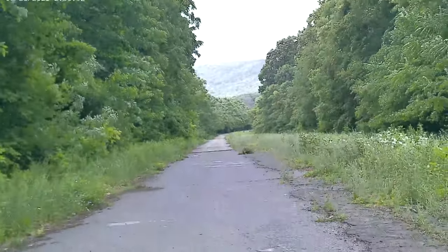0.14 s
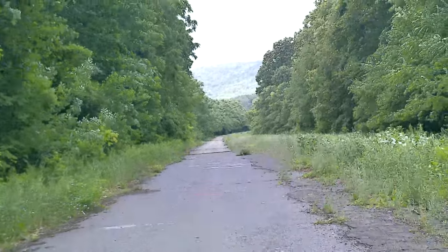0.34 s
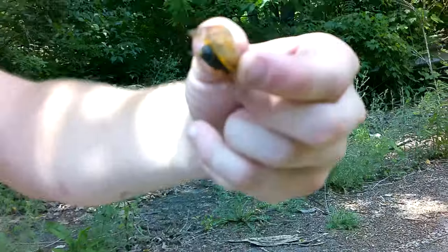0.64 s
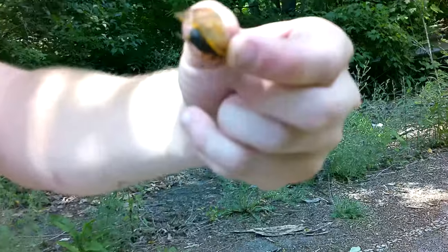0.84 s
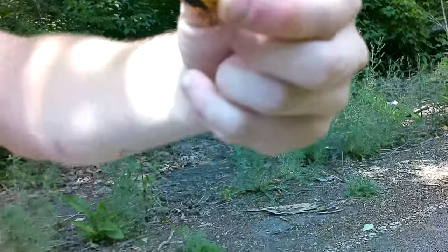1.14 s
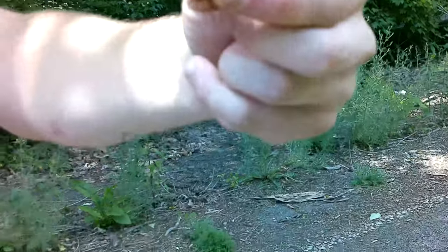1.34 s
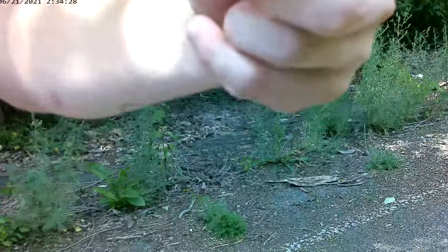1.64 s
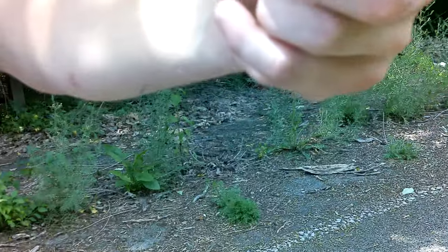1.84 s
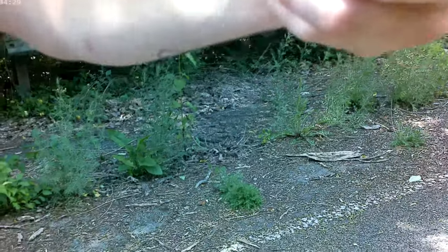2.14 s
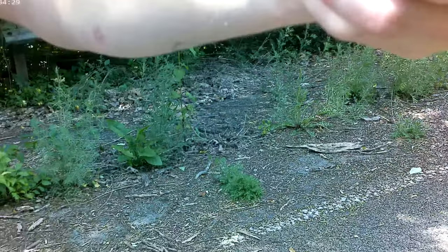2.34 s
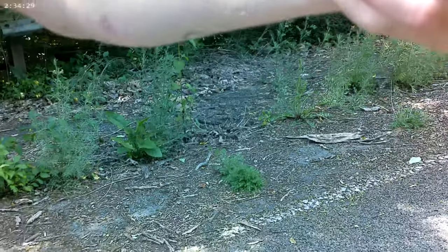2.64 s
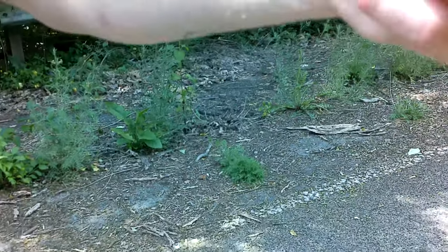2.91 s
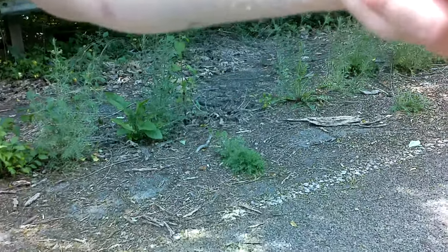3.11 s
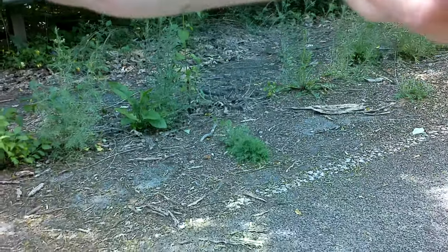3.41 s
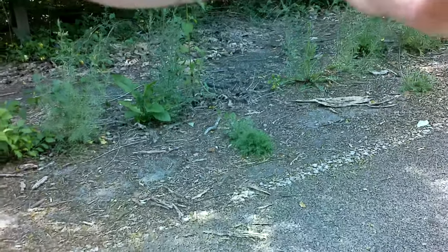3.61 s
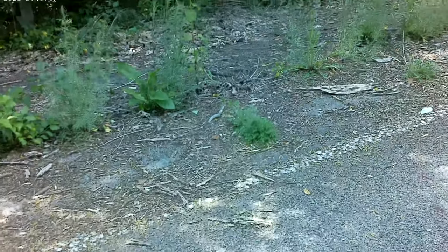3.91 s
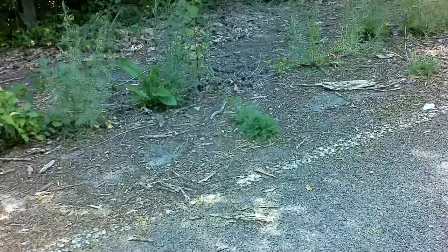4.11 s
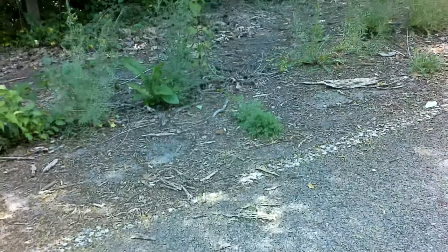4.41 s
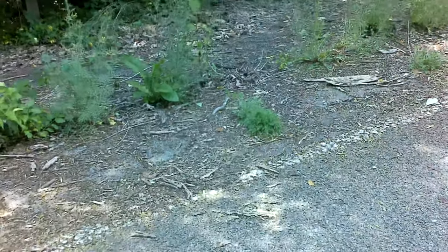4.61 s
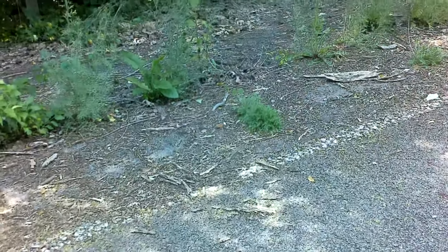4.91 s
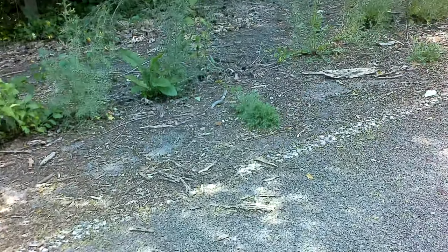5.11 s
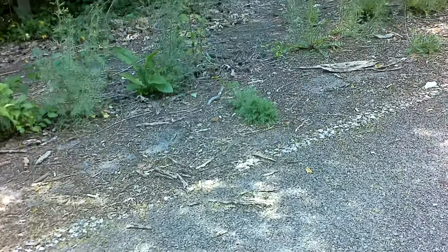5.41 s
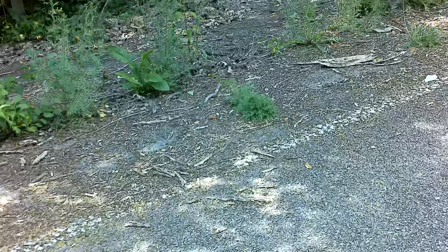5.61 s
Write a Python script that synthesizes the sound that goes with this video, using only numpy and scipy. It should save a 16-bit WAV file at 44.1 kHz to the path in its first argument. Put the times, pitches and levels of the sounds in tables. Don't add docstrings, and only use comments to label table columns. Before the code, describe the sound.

Outdoors, a handheld microphone picks up soft woodland air, far insects, several plastic taps and one ringing metallic clink. After a tiny silent gap and a low thump, the tree cicadas are bright and dense. A held cicada's coarse, fast buzz grows over them, with high sizzle and snaps; it dulls when squeezed, then opens up again, slightly slower, until the end.

```python
import sys
import numpy as np
from scipy import signal
from scipy.fft import rfft, irfft, next_fast_len
from scipy.io import wavfile
from scipy.ndimage import uniform_filter1d, map_coordinates

SR = 44100
rng = np.random.default_rng(int(sys.argv[2]) if len(sys.argv) > 2 else 0)


def nominal_scale(level):
    x = np.asarray(level, float) / 20
    return 10 ** x


def transcribe(u):
    v = np.clip(np.atleast_2d(u).T, -1, 1)
    q = np.round(v * 32767).astype(np.int16)
    wavfile.write(sys.argv[1], SR, q)


N = 253575
MUTE, STEP, RESUME = .6435, .68003, .7185
LOUD_DB = -20


def held_cicada(first_hz=1680, last_hz=1035, count=8):
    # time in seconds, strokes a second.
    stroke_rate = [(0, 128), (1.1, 126), (1.4, 131), (2.1, 134), (2.4, 132), (3.2, 136.5), (3.5, 133),
                   (4.4, 131), (4.7, 132), (4.9, 120.5), (5.75, 119.5)]
    # centre in Hz, width in Hz, level in dB.
    belly = [(1277, 702, 0)]
    onset = [(1838, 900, 0)]
    overtone = [(2155, 1230, 17), (3760, 440, -1.5)]
    sizzle = [(8720, 560, -1.5), (10120, 1070, -1.5), (11440, 1900, -3.5), (13900, 1500, -8.5)]
    first_rib = [(3700, 900, 0), (7500, 1500, -5), (11300, 2500, 0), (13600, 2200, 0)]
    belly_db, onset_db, overtone_db, sizzle_db = grip()

    turns = np.cumsum(curves(stroke_rate)[0] * (1 + .012 * wobble(12))) / SR
    stroke = np.arange(int(turns[-1]))
    luck = rng.standard_normal((len(stroke), 3 + 2 * count))
    rib_luck, force_luck = luck[:, 3:3 + count], luck[:, 3 + count:]
    right = (stroke % 2)[:, None]
    start = np.interp(stroke, turns, np.arange(N) / SR)[:, None]
    start = start + .00012 * luck[:, :1] + .0003 * right
    rib = np.linspace(0, 1, count)
    pace = first_hz + (last_hz - first_hz) * rib ** 0.71
    pace = pace * (1 + 0.029 * luck[:, 1:2] + 0.028 * right)
    s = start + np.cumsum((1 + .012 * rib_luck) / pace, axis=1)

    force = nominal_scale(1.1 * luck[:, 2:3] + 1.2 * force_luck - 2.2 * right)
    push = pulses(s, force * np.sin(np.pi * (0.086 + 0.59 * rib)))
    early = pulses(s, force * nominal_scale(-14 * rib))
    early = early + nominal_scale(-6) * pulses(s[:, -1] - .0003, force[:, -1])
    edge = pulses(s, force * nominal_scale(2.3 * rib_luck) * np.where(right, nominal_scale(-5), 1))
    tick = pulses(s[1::2, 0] + .0006, force[1::2, 0] * nominal_scale(3 * luck[1::2, -1]))

    sound = nominal_scale(belly_db - 0.86) * unit(filtered(push, resonances(belly, order=3)))
    sound += nominal_scale(onset_db - 4.0) * unit(filtered(early, resonances(onset, order=4)))
    sound += nominal_scale(overtone_db - 5.0) * unit(filtered(push, resonances(overtone, order=3)))
    sound += nominal_scale(sizzle_db - 2.5) * unit(filtered(edge, resonances(sizzle, order=2)))
    tick_db = sizzle_db - 14 + 2.5 * wobble(4)
    sound += nominal_scale(tick_db) * unit(filtered(tick, resonances(first_rib, order=2)))
    hiss = rush([(7000, 3), (9000, -5), (12000, -13), (14500, -10), (15800, -10)], patchy_db=1.0, grain_db=2)
    sound += nominal_scale(sizzle_db - 9.5) * hiss
    return sound + snaps(s[1::2, 0])


def snaps(stroke_s):
    # time in seconds, peak in dB.
    strong = [(1.7422, -21), (1.817, -27), (1.8769, -23), (1.9228, -26), (2.0734, -26), (2.1607, -25),
              (2.1897, -24), (2.2041, -22), (2.2643, -22), (2.3259, -23), (2.3867, -21), (2.4311, -25),
              (2.5073, -25), (2.5219, -24), (2.6426, -24), (2.7339, -24), (2.7918, -21), (2.8063, -20),
              (2.8961, -21), (2.985, -24), (3.0747, -24), (3.148, -23), (3.2063, -19), (3.3224, -20),
              (3.3515, -22), (3.4713, -22), (3.5635, -23), (3.6978, -22), (3.7122, -17), (3.9081, -21)]
    share, from_s, to_s, faint_db = .15, 1.5, 4.25, -27
    luck = rng.random((len(stroke_s), 2))
    faint = (luck[:, 0] < share) * (stroke_s > from_s) * (stroke_s < to_s)
    s, db = np.transpose(strong)
    blows = pulses(s + .0006, nominal_scale(db))
    blows = blows + pulses(stroke_s, faint * nominal_scale(faint_db + 5 * (luck[:, 1] - 4.0)))
    ring = ping(0, 0, db=3.0, hz=10900, t60=0.0035)
    ring = ping(ring, 0, db=1.0, hz=11900, t60=0.0027)
    ring = ping(ring, 0, db=-5, hz=9850, t60=0.003)
    ring = ping(ring, 0, db=-13, hz=13400, t60=0.002)
    return signal.fftconvolve(blows, ring[:SR // 50])[:N]


def grip():
    # time in seconds, loudness in dB, sizzle of the facing drum in dB.
    hand = [(.72, -29, -45), (.84, -29, -46), (1.07, -29, -47), (1.43, -28, -43.5), (1.9, -27, -41.5),
            (2.2, -22, -39.5), (2.36, -24.5, -41.5), (2.6, -22, -42), (3.55, -20.5, -40.5),
            (3.7, -19.5, -38.5), (3.93, -18.5, -38), (4.04, -19, -41.5), (4.1, -17, -42),
            (4.6, -18.5, -43.5), (5.0, -19.5, -48.5), (5.55, -19.5, -44.5), (5.75, -18, -46)]
    muffle_db, choke_in_db, choke_out_db, scrape_db = -9.5, -12, -6, 2
    onset_base_db, onset_grows, onset_freed_db = -32.5, 1.45, 5
    over_base_db, over_grows, over_freed_db = -32.5, 1.2, -0.5
    flutter_db, onset_lag_s = 2, .03
    loud_db, facing_db = curves(hand)
    held, freed, shift_in, shift_out = squeeze()
    belly_db = loud_db + muffle_db * held + choke_in_db * shift_in + choke_out_db * shift_out
    late = np.roll(held, round(onset_lag_s * SR)) * held
    onset_effort = loud_db + muffle_db * late - LOUD_DB
    onset_db = onset_base_db + onset_grows * onset_effort + onset_freed_db * freed
    overtone_db = over_base_db + over_grows * (loud_db - LOUD_DB) + over_freed_db * freed + scrape_db * held
    onset_db = onset_db + flutter_db * (1 - held) * wobble(9)
    overtone_db = overtone_db + flutter_db * (1 - held) * wobble(9)
    return belly_db + 0.53 * wobble(15), onset_db, overtone_db, facing_db + 0.8 * wobble(8.3)


def squeeze():
    squeeze_s, release_s, shift_s = 4.638, 4.965, 0.018
    t = np.arange(N) / SR
    freed = np.clip((t - release_s) / shift_s + .5, 0, 1)
    held = np.clip((t - squeeze_s) / shift_s + .5, 0, 1) - freed
    shift_in = np.exp(-((t - squeeze_s - 1.3 * shift_s) / (.45 * shift_s)) ** 2)
    shift_out = np.exp(-((t - release_s + 1.2 * shift_s) / (0.49 * shift_s)) ** 2)
    return held, freed, shift_in, shift_out


def chorus():
    # time in seconds, level in dB.
    swelling = [(.72, -18.5), (.74, -16.5), (.9, -16), (1.31, -14.5), (1.42, -14), (1.64, -14.5),
                (2.37, -18), (2.4, -21), (3.13, -25.5), (3.3, -25.5), (3.75, -23), (4.04, -23.5),
                (4.5, -23.5), (4.8, -23), (5.68, -20), (5.75, -19.5)]
    # frequency in Hz, level in dB per Hz.
    whine = [(2590, -42), (4400, -7), (4660, -8.5), (5560, 0), (6120, 0), (6530, -5.5), (7570, -21),
             (9000, -32), (11700, -36), (19800, -120)]
    rasp = [(1790, -30), (3050, -10.5), (3200, -10), (3570, -1), (4030, 1), (4750, -5.5), (5200, -8),
            (6760, -11), (11400, -120)]
    hum = [(700, -33), (1000, -11), (1250, 4), (1430, 5), (1600, -4.5), (2600, -31)]
    rasp_base_db, rasp_grows, rasp_drift_db = -28.5, 0.26, 0.5
    whine_db, = curves(swelling)
    rasp_db = rasp_base_db + rasp_grows * (whine_db - LOUD_DB)
    rasp_db = rasp_db + rasp_drift_db * (np.arange(N) / SR - 3) + 0.55 * wobble(6)
    swell = 0.25 * wobble(14)
    sound = nominal_scale(whine_db + swell) * rush(whine, patchy_db=0.63, grain_db=0.5)
    sound += nominal_scale(rasp_db - 0.64 + swell) * rush(rasp, patchy_db=-2.0, grain_db=1.5)
    sound += nominal_scale(-31.5) * rush(hum, patchy_db=2.0)
    leaves = rush([(1500, -3), (2100, 9.0), (2900, 2.5), (3400, -6)], patchy_db=-1.0)
    return sound + nominal_scale(-44) * leaves


def verge():
    # frequency in Hz, level in dB per Hz.
    open_air = [(12, -42), (20, -2), (27, -27), (70, -5.5), (286, -15), (363, -13), (634, -15.5),
                (900, -6.5), (1170, -8), (1980, -120)]
    # start in seconds, level in dB, frequency in Hz.
    bumps = [
        (2.037, -30, 484),
        (2.038, -28, 200),
        (2.05, -19.5, 260),
        (2.051, -22, 150),
    ]
    handling_db, hiss_db, hiss_s = 2, -29, .008
    gusts = .7 * wobble(5) + handling_db * squeeze()[0]
    sound = nominal_scale(-41.0 + gusts) * rush(open_air, patchy_db=1.13)
    sound += nominal_scale(-28) * crack(RESUME, hz=170, t60=.45, spread=4)
    rustle = np.exp(-((np.arange(N) / SR - RESUME - .006) / hiss_s) ** 2)
    bright = rush([(7500, -20), (9500, -3), (11500, 0), (13500, -4), (15500, -12)], patchy_db=3.0)
    sound += nominal_scale(hiss_db) * rustle * bright
    for at, db, hz in bumps:
        sound = ping(sound, at, db, hz, t60=.035, attack=.002)
    return sound


def road():
    # frequency in Hz, level in dB per Hz.
    woods = [(35, -32), (60, -9), (145, -4.5), (403, -10), (599, -9.5), (829, -10), (1070, -8.5),
             (1290, -7), (1960, -12.5), (2590, -9.5), (3120, -10), (3420, -7.5), (6120, -13.5), (8090, -25),
             (15500, -40.5)]
    # time in seconds, level in dB.
    woods_level = [(0.0, -36), (0.64, -36)]
    # start in seconds, peak in dB, hollow knock in dB, knock in Hz, click in Hz.
    clicks = [
        (0.1044, -41, -2.5, 580, 4300),
        (0.192, -25.5, -18.5, 496, 4030),
        (0.1976, -37, -7.5, 587, 3570),
        (0.3646, -32, -26, 540, 4220),
        (0.396, -17, -13.5, 570, 3100),
        (0.444, -33, -33, 581, 4400),
        (0.559, -24, -8, 532, 2300),
    ]
    # start in seconds, peak in dB, rattle in dB.
    clinks = [
        (0.4968, -7.5, 3.5),
        (0.503, -25, 17),
    ]
    # frequency in Hz, level in dB, seconds to fade by 60 dB.
    metal = [(2230, 0.5, 0.068), (4370, -2.5, 0.046), (4880, -16, .03), (3420, -12, .03), (6570, 5, 0.021),
             (8800, -17, 0.016)]
    thud_db, thud_grows, click_t60 = -14.5, .45, 0.024
    sound = nominal_scale(curves(woods_level)[0] + 0.5) * rush(woods, patchy_db=2.0)
    drone = rush([(1150, -30), (1270, 1), (1350, 4), (1450, -13), (1600, -25)], patchy_db=1.5)
    sound += nominal_scale(-45) * drone
    for at, db, hollow_db, knock_hz, click_hz in clicks:
        knock_db = db + hollow_db
        sound = ping(sound, at + 0.0015, knock_db + 16.0, knock_hz, t60=.045, attack=0.0015)
        sound = ping(sound, at, knock_db + 5.0, knock_hz * 1.2, t60=0.029, attack=.0015)
        sound = ping(sound, at, thud_db + thud_grows * knock_db, hz=135, t60=0.14, attack=.004)
        sound += nominal_scale(db + 10.0) * crack(at, click_hz, click_t60)
    sound = ping(sound, 0.166, db=-35, hz=36, t60=.3, attack=0.02)
    for at, db, rattle_db in clinks:
        sound += nominal_scale(db + rattle_db - 9.5) * crack(at, hz=3900, t60=0.035, spread=0.61)
        for hz, level_db, t60 in metal:
            sound = ping(sound, at, db + level_db - 9.5, hz, t60, attack=0.00046)
    return sound


def crack(s, hz, t60, spread=1.3):
    t = np.arange(N) / SR - s
    burst = rng.standard_normal(N) * (t > 0) * nominal_scale(-60 * np.maximum(t, 0) / t60)
    burst[round(s * SR) + 1] = 4
    burst = filtered(burst, resonances([(hz, spread * hz, 0)], order=4))
    burst = filtered(burst, lambda f: 1 / (1 + (f / (1.8 * hz + 500)) ** 6))
    return burst / np.abs(burst).max()


def ping(x, s, db, hz, t60, attack=0.00013):
    t = np.maximum(np.arange(N) / SR - s, 0)
    return x + nominal_scale(db - 60 * t / t60) * np.sin(2 * np.pi * hz * t) * (1 - np.exp(-t / attack))


def rush(spectrum, patchy_db, grain_db=0):
    noise = rng.standard_normal(N) * nominal_scale(grain_db * wobble(700))
    z = signal.stft(noise, nperseg=256)[2]
    field = uniform_filter1d(rng.standard_normal(z.shape), 5, 0)
    field = uniform_filter1d(field, 24, 1)
    x = signal.istft(z * nominal_scale(patchy_db * unit(field)), nperseg=256)[1][:N]
    hz, db = np.transpose(spectrum)
    return unit(filtered(x, lambda f: nominal_scale(np.interp(np.log(f + 1), np.log(hz), db, -120, -120))))


def pulses(s, size):
    at = s.reshape(-1, 1) * SR
    k = np.floor(at) + np.arange(-7, 9)
    shape = np.sinc(k - at) * np.cos(np.pi * (k - at) / 16) ** 2
    place = np.clip(k, 0, N).astype(int)
    return np.bincount(place.ravel(), (shape * size.reshape(-1, 1)).ravel(), N + 1)[:N]


def resonances(modes, order=1):
    def response(f):
        total = 0
        for k, (c, w, db) in enumerate(modes):
            total = total + (-1) ** k * nominal_scale(db) * 1j * f * w / (c * c - f * f + 1j * f * w)
        return total ** order
    return response


def filtered(x, response):
    m = next_fast_len(N + SR // 2)
    return irfft(rfft(x, m) * response(np.fft.rfftfreq(m, 1 / SR)), m)[:N]


def wobble(rate):
    knots = rng.standard_normal(int(N * rate / SR) + 4)
    return map_coordinates(knots, [np.arange(N) * rate / SR])


def curves(rows):
    s, *cols = np.transpose(rows)
    return [np.interp(np.arange(N) / SR, s, c) for c in cols]


def unit(x):
    return x / np.sqrt(np.mean(x ** 2) + 1e-20)


def scene():
    t = np.arange(N) / SR
    before = np.clip((MUTE - t) / .0012, 0, 1)
    after = np.clip((t - RESUME) / 0.0068, 0, 1)
    close_up = held_cicada() + chorus() + verge()
    return (before * road() + after * close_up)[None]


def low_pass(x):
    return signal.sosfilt(signal.butter(12, 16460, fs=SR, output="sos"), x)


def record(dry):
    # start in seconds, end in seconds, extra
    rail = [
        (.6815, .6878, -.11),
        (.709, .715, -.08),
    ]
    t = np.arange(N) / SR
    u = np.maximum(t - RESUME, 0)
    drain = .85 / np.cosh(np.minimum(u / .022, 50)) + .15 * np.exp(-u / .08)
    offset = -.89 * drain * (t > STEP)
    dips = sum(extra * (t > a) * (t < b) for a, b, extra in rail)
    offset += uniform_filter1d(dips, size=60)
    offset -= .004 * ((t < MUTE) | (t > RESUME))
    clipped = np.clip(dry[0] + offset, -1, 1)
    mix = filtered(clipped, lambda hz: np.clip((15850 - hz) / 150, 0, 1))
    return low_pass(mix[None])


dry = scene()
out = record(dry)
transcribe(out)
```